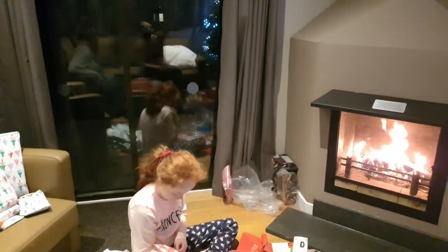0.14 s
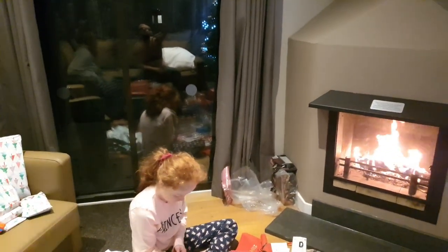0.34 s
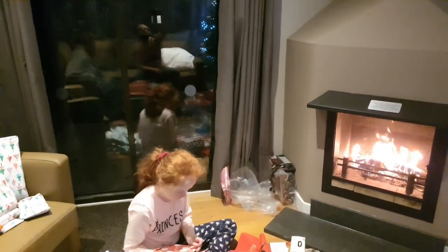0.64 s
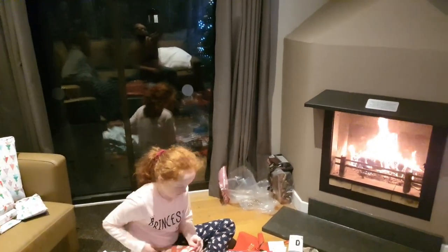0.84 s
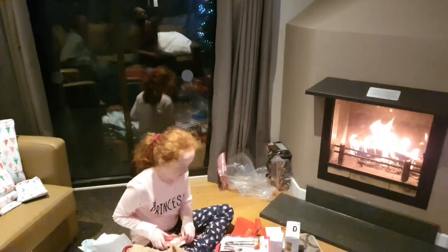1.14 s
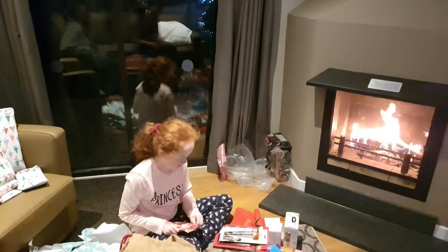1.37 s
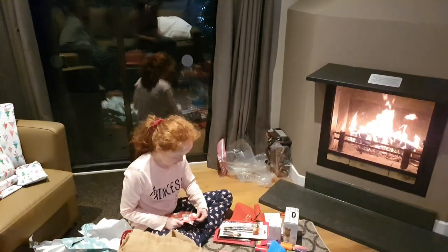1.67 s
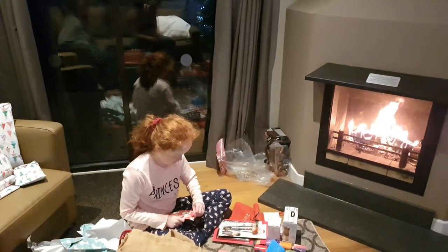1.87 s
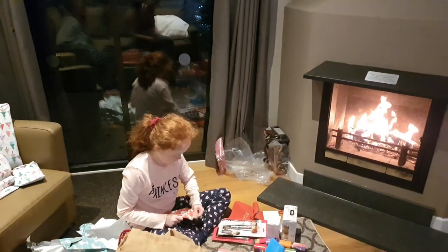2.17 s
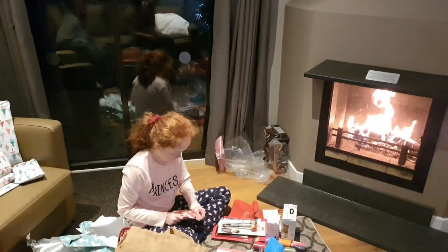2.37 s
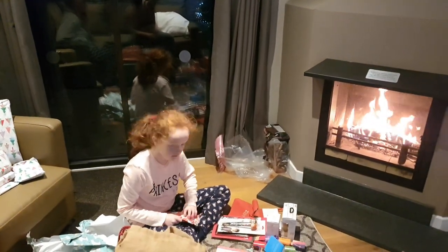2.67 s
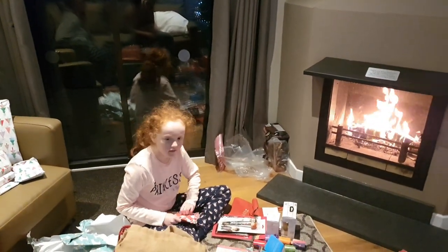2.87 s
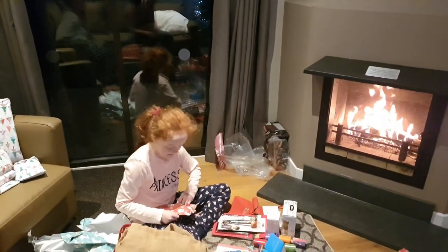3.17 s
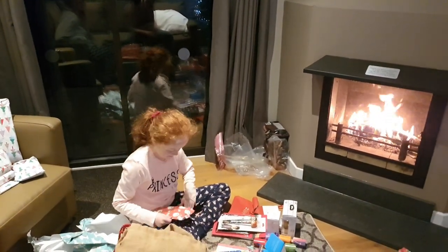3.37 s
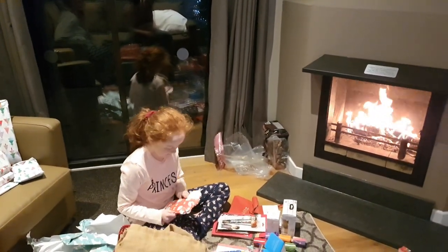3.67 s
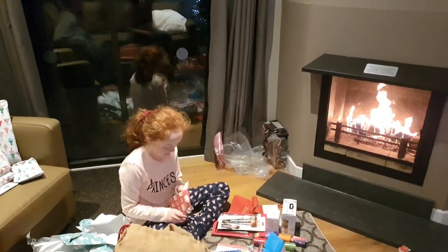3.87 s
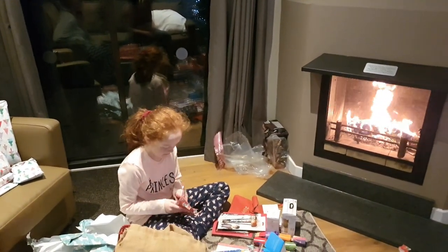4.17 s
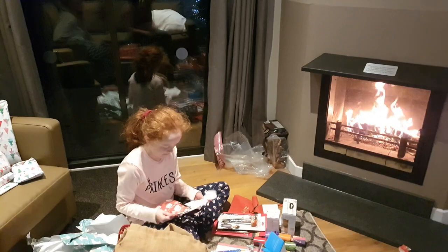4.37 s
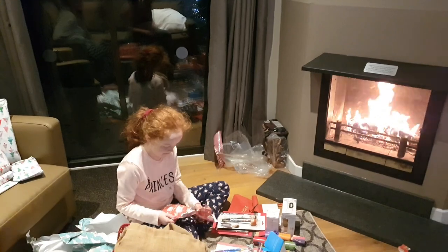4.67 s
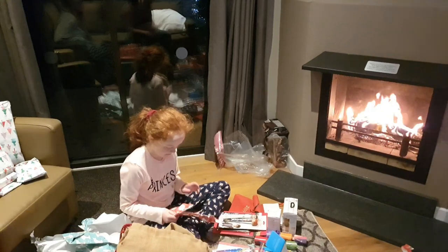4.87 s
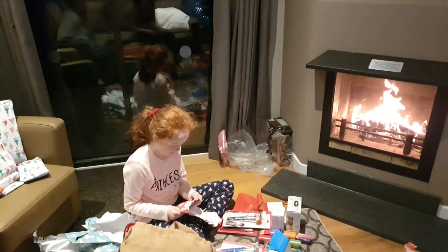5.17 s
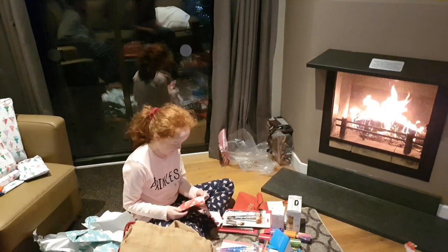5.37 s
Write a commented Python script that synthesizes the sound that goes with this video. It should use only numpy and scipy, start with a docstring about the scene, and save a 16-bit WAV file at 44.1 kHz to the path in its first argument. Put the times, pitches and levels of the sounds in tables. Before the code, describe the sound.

Wrapping paper crackles in small irregular bursts, with sharp fold snaps and quick rips, growing into louder tearing in a quiet living room.

```python
"""Wrapping paper crackles as a child on a living-room floor picks at a small present and tears it open.
Creases and breaking fibres make crowds of tiny clicks, quick rips are short bursts, and single folds snap.
Filtered noise flexes the sheet and rings the parcel, whose hollow bumps are short scrapes through a resonance.
The room adds early echoes and a short tail, over a low rumble with faint hiss."""
import sys
import numpy as np
from scipy import signal
from scipy.fft import rfft, irfft, next_fast_len
from scipy.io import wavfile

SR = 44100
rng = np.random.default_rng(int(sys.argv[2]) if len(sys.argv) > 2 else 0)


def generate_wav(sig):
    """Save sig (samples, or channels by samples) to the path in sys.argv[1] as 16-bit PCM at SR."""
    pcm = np.round(np.clip(np.atleast_2d(sig).T, -1, 1) * 32767).astype(np.int16)
    wavfile.write(sys.argv[1], SR, pcm)


N = 243873
T = np.arange(N) / SR  # time [s]


def undb(db):
    """Turn decibels into gain."""
    return 10 ** (np.asarray(db) / 20)


def unit(x):
    """Scale a sound to an rms level of 1."""
    return x / np.sqrt(np.mean(x ** 2))


def even(response):
    """Scale an impulse response so its squares add up to 1."""
    return response / np.sqrt(np.sum(response ** 2))


def at(points, hz):
    """Read (Hz, value) points, with straight lines between them on a log-frequency axis."""
    f, value = np.transpose(points)
    return np.interp(np.log(np.maximum(hz, 1)), np.log(f), value)


def ring(x, response):
    """Pass a sound through an impulse response, by convolution."""
    return signal.oaconvolve(x, response)[:len(x)]


def colour(points, size=4096):
    """Make an impulse response with a given (Hz, dB) spectrum that never sounds before its cause."""
    log_gain = np.log(undb(at(points, np.fft.rfftfreq(size, 1 / SR))))
    cepstrum = irfft(log_gain)
    # folding the second half onto the first puts the energy as early as possible (minimum phase)
    cepstrum[1:size // 2] *= 2
    cepstrum[size // 2 + 1:] = 0
    return irfft(np.exp(rfft(cepstrum)))


def brighten(x, treble_db, hinge_hz=6000):
    """Lift or lower everything above the hinge, like a treble knob."""
    low = signal.sosfiltfilt(signal.butter(2, hinge_hz, fs=SR, output="sos"), x)
    return low + undb(treble_db) * (x - low)


def hollow(x, middle_db, centre_hz=1350):
    """Lift or lower the papery middle with a bell-shaped filter."""
    band = signal.lfilter(*signal.iirpeak(centre_hz, .8, fs=SR), x)
    return x + (undb(middle_db) - 1) * band


def walk(rate):
    """Wander at random with a spread near 1: `rate` new values a second, joined by straight lines."""
    points = rng.standard_normal(N // 100)
    return np.sqrt(3 / 2) * np.interp(T * rate, np.arange(len(points)), points)


def rustle(clicks_per_s=2400, crackle_db=-1.0, usual_db=-46, crowding=0.65, snag_db=0.86, snags_per_s=60,
           folds_per_s=45, fold_db=-8):
    """Handling and long tears: harder work brings more clicks, and small folds flip among them."""
    work_db, treble_db, middle_db = hands()
    crowd = undb(crowding * (work_db - usual_db))  # 1 at the usual work level
    fibres = crackle(clicks_per_s * crowd, spread_db=6.0)
    folds = crackle(folds_per_s * crowd, spread_db=1.5)
    clicks = hollow(brighten(fibres + undb(fold_db) * folds, treble_db), middle_db)
    # the paper snags and lets go, so the level wanders quickly
    level_db = work_db + crackle_db + snag_db * walk(snags_per_s)
    return deforming(clicks * undb(level_db))


def hands(rest_db=-80):
    """Add up the work of the hands in dB; the strongest gesture counts most for treble and middle."""
    power, treble, middle = undb(rest_db) ** 2, 0, 0
    for envelope, db, _, treble_db, middle_db in gestures():
        share = (undb(db) * envelope) ** 2
        power = power + share
        treble = treble + share * treble_db
        middle = middle + share * middle_db
    return 10 * np.log10(power), treble / power, middle / power


def gestures(grip_s=.006, let_go_s=0.017, drift_db=-0.5, squeeze_s=0.017, relax_s=0.016):
    """Give each pull and squeeze as (envelope, crackle dB, flex dB, treble dB, middle dB)."""
    # steady pulls, from light fingering to the long tear, all levels relative:
    # (start [s], length [s], crackle [dB], flex [dB], treble change [dB], middle change [dB])
    pulls = [(0.17, 0.14, -41.5, -61.5, -3.5, 1.5), (0.349, 0.066, -54, -64, 1.5, 5.5),
             (0.666, 0.074, -55.5, -72, 2, 4), (0.777, 0.094, -52, -58.5, -7, 4),
             (1.117, .12, -55, -68.5, -3.5, -2.5), (1.247, 0.13, -50.5, -60.5, -8.5, 1.5),
             (1.498, 0.21, -49.5, -63, -12.5, -3.5), (1.793, 0.12, -49, -64, -5, -8),
             (1.946, 0.15, -59, -68, 10, 6.5), (2.084, .16, -50.5, -57.5, 0, -1),
             (2.395, 0.23, -50, -60.5, -8.5, 0), (2.592, 0.31, -47, -56.5, -4, 0),
             (2.95, .11, -40.5, -52.5, 2, 7), (3.23, 0.14, -50, -53.5, -1.5, 6.5),
             (3.347, 0.1, -42, -47, -1.5, 4.5), (3.657, 0.057, -55, -63, -12, 5.5),
             (3.747, .14, -44.5, -53.5, -5.5, 2.5), (3.928, 0.098, -44, -57, -16, -1.5),
             (4.229, 0.089, -34.5, -51.5, -3.5, 0), (4.319, 0.15, -32, -40, -3, 2),
             (4.522, 0.045, -38.5, -56, -1.5, -1), (4.655, 0.041, -41, -54.5, 4.5, 4.5),
             (4.70, 0.16, -53.5, -63, -23, -2.5), (4.937, .06, -57.5, -71, -3, 3),
             (5.0, 0.12, -50.5, -59, -19, 0.5), (5.102, .1, -45, -56, -13, -2),
             (5.254, 0.13, -46, -57.5, -9, -3), (5.392, 0.094, -49, -51.5, -25, 7.5)]
    # short squeezes that crumple the paper, all levels relative:
    # (peak time [s], crackle [dB], flex [dB], treble change [dB], middle change [dB])
    crumples = [(0.066, -47.5, -59.5, 4.5, 12), (0.574, -40, -47.5, 1, 5), (0.772, -37.5, -61, -0.5, -5),
                (0.973, -47.5, -53, 4.5, 5.5), (1.432, -37.5, -50.5, -10, 6), (1.616, -41, -80, 4.5, -3),
                (2.011, -44, -74, -8, -2.5), (2.797, -40, -47.5, 1.5, 5), (2.91, -42, -69, -5, 2.5),
                (3.047, -32.5, -49, -4, -6.5), (3.108, -32, -42.5, -1, 5), (3.39, -36.5, -57, -5, 6),
                (4.145, -47.5, -55.5, 0.5, 0), (4.395, -30, -42, 2, 1.5), (4.468, -33, -40, 5, 6),
                (4.822, -45, -52.5, -24, -1.5)]
    for s, length, *touch in pulls:
        grip = 1 - np.exp(-np.maximum(T - s, 0) / grip_s)
        drift = undb(drift_db * (np.clip((T - s) / length, 0, 1) - .5))  # eases off slightly
        let_go = np.exp(-np.maximum(T - s - length, 0) / let_go_s)
        yield grip * drift * let_go, *touch
    for s, *touch in crumples:
        yield np.exp(-np.maximum((s - T) / squeeze_s, (T - s) / relax_s)), *touch


def crackle(rate, spread_db, decay_s=0.00047, size=128):
    """Scatter clicks at random moments: mostly small, each a short fading grain of noise."""
    strength = undb(spread_db * np.minimum(rng.exponential(size=N), 4))
    energy = strength ** 2 * (rng.random(N) < rate / SR)
    # dividing by the rate keeps a denser crowd from also being louder
    energy = ring(energy / rate, np.exp(-2 * T[:size] / decay_s))
    return unit(np.sqrt(np.abs(energy)) * rng.standard_normal(N))


def deforming(x, wander_db=1.7, changes_per_s=22, count=14):
    """As the sheet changes shape its resonances come and go: each band's level wanders by itself."""
    size = next_fast_len(N)
    centres, hz = np.geomspace(800, 15000, count), np.fft.rfftfreq(size, 1 / SR)
    spectrum, out = rfft(x, size), 0
    for weights in np.eye(count):  # each row picks out one band
        band = irfft(spectrum * at(list(zip(centres, weights)), hz), size)[:N]
        out = out + band * undb(wander_db * walk(changes_per_s))
    return out


def rips():
    """A split runs quickly through taut paper: bursts of fibre clicks, and noise tugging the sheet."""
    # quick rips, fibres parting in one run, all levels relative:
    # (start [s], length [s], crackle [dB], tug [dB], treble change [dB], middle change [dB])
    splits = [(0.18, 0.007, -49.5, -79, 3, 10), (0.473, 0.003, -41, -52, 6.5, 3.5),
              (0.755, 0.018, -34.5, -56.5, -9, -1.5), (1.404, 0.0042, -35, -74, -22, -17),
              (1.477, 0.0082, -34, -55, -6.5, 1.5), (2.125, 0.038, -44, -81, 6, 5.5),
              (2.271, 0.025, -32, -39, -3.5, 3.5), (3.233, 0.0089, -47, -75, -17, 14.5),
              (3.738, 0.0028, -42.5, -42.5, -13, 8.5), (3.904, 0.038, -41.5, -62, -0.5, 9),
              (4.095, 0.0072, -42.5, -52.5, -13, -1)]
    fibres, tug = np.zeros((2, N))
    clicks = crackle(6000, spread_db=3.0)
    pull = rng.standard_normal(N)
    for s, length, db, flex_db, treble_db, middle_db in splits:
        run = slice(int(s * SR), int((s + length) * SR))
        burst = brighten(unit(clicks[run]), treble_db)
        fibres[run] += undb(db) * hollow(burst, middle_db)
        tug[run] += undb(flex_db) * pull[run]
    return fibres, tug


def snaps(snap_db=14.0, treble_db=4.5, decay_s=.00035, shiver_db=-16, shiver_s=.003, size=1024):
    """A fold flips over with one sharp tick of noise, and the paper shivers more softly after it."""
    # single folds and tape edges that snap: (time [s], relative level [dB])
    folds = [(0.0338, -37), (0.1754, -34), (0.4643, -32), (0.6784, -43), (0.7377, -27), (0.7522, -29),
             (1.1258, -43), (1.3977, -36), (1.4745, -33), (1.5499, -38), (1.5748, -32), (1.8048, -45),
             (1.8721, -34), (2.1385, -24), (2.2722, -20), (2.4139, -37), (2.6085, -37), (2.7392, -34),
             (2.9113, -30), (3.0844, -26), (3.2321, -36), (3.675, -45), (3.7334, -32), (3.7793, -32),
             (4.0143, -36), (4.0961, -38), (4.2193, -39), (4.5496, -28), (4.6099, -22), (4.816, -36),
             (4.9327, -39), (5.0045, -41), (5.1158, -30), (5.1522, -31), (5.2485, -40), (5.2964, -34),
             (5.3672, -38), (5.4171, -34), (5.4834, -36)]
    out = np.zeros(N + size)
    t = T[:size]
    fade = np.exp(-t / decay_s) + undb(shiver_db) * np.exp(-t / shiver_s)
    for (s, db), grain in zip(folds, rng.standard_normal((len(folds), size))):
        start = int(s * SR)
        out[start:start + size] += undb(db + snap_db) * even(grain * fade)
    return brighten(out[:N], treble_db, hinge_hz=9500)


def bend():
    """The same gestures bend the whole sheet: their flex strengths add as powers."""
    return np.sqrt(sum((undb(flex_db) * envelope) ** 2 for envelope, _, flex_db, _, _ in gestures()))


def flexing(drive):
    """The sheet flaps over a broad range and rings the fading tones of the parcel under it."""
    # colour of the flapping sheet: (frequency [Hz], relative level [dB])
    sheet_tone = [(70, -25), (140, -6.5), (260, -5), (380, 0), (500, 9.5), (620, 0.5), (850, 5),
                  (1300, -26), (2500, -16.5)]
    # tones of the wrapped parcel: (frequency [Hz], time to fade by 60 dB [s], relative level [dB])
    parcel = [(425, .10, -12), (480, .08, -11), (596, .11, -12), (682, .09, -16)]
    t, modes = T[:SR // 4], 0
    for hz, t60, db in parcel:
        tone = np.sin(2 * np.pi * hz * t) * np.exp(-np.log(1000) * t / t60)
        modes = modes + undb(db) * even(tone)
    return ring(drive, even(colour(sheet_tone))) + ring(drive, modes)


def bumps(sharpness=2.9, size=8192):
    """A short scrape of contact noise rings one hollow resonance."""
    # bumps, pops and rubs of the wrapped parcel, plus a brief high ring at 2.27 s: (time [s], pitch [Hz],
    # length [s], relative level [dB])
    knocks = [(0.219, 298, 0.02, -53), (0.678, 517, 0.0074, -50), (0.874, 235, 0.048, -59.5),
              (2.128, 550, 0.015, -44.5), (2.272, 1840, 0.015, -31), (2.274, 240, 0.0073, -45.5),
              (2.275, 444, 0.0088, -36.5), (2.693, 1080, 0.0061, -44.5), (3.089, 517, 0.042, -44.5),
              (3.383, 483, 0.031, -51), (3.753, 303, 0.02, -48.5), (3.921, 400, 0.017, -45),
              (4.423, 92, 0.0533, -59.5), (4.446, 192, 0.021, -51), (4.450, 405, 0.029, -40.5),
              (5.084, 430, 0.0154, -48), (5.148, 328, .016, -47), (5.401, 980, 0.0064, -42.5),
              (5.429, 785, 0.052, -48.5), (5.478, 144, 0.032, -50.5)]
    out = np.zeros(N + size)
    for (s, hz, length, db), contact in zip(knocks, rng.standard_normal((len(knocks), size))):
        scrape = contact * (T[:size] < length)
        tone = signal.lfilter(*signal.iirpeak(hz, sharpness, fs=SR), scrape)
        start = int(s * SR)
        out[start:start + size] += undb(db) * np.sqrt(length * SR) * even(tone)
    return out[:N]


def scatter(x, count, size=64):
    """Each crease faces its own way, so short slices of sound take different paths through the room."""
    path = np.repeat(rng.integers(0, count, N // size + 1), size)[:N]
    return sum(room(x * (path == k)) for k in range(count))


def room(x, direct_db=-6.0, tail_db=-1.5, build_s=.002, right_lag=3, size=18000):
    """Direct sound (left first, right a few samples later), early echoes and a tail longest in the bass."""
    # early echoes off floor and furniture: (rough delay [s], level against the direct sound [dB])
    echoes = [(.005, -2), (.0092, -12.5), (0.0131, -28.5), (0.011, -5)]
    # how long the tail lasts: (frequency [Hz], time to fade by 60 dB [s])
    fade_times = [(150, .5), (500, 0.3), (1400, 0.28), (4000, 0.28), (10000, 0.22), (16000, 0.25)]
    t, hz = T[:size], np.fft.rfftfreq(size, 1 / SR)
    noise, tail = rfft(pair(size)), 0
    for k, (_, t60) in enumerate(fade_times):
        share = at([(f, j == k) for j, (f, _) in enumerate(fade_times)], hz)
        tail = tail + irfft(noise * share, size) * np.exp(-np.log(1000) * t / t60)
    tail = tail * (1 - np.exp(-(t / build_s) ** 2))
    responses = undb(tail_db) * np.array([even(late) for late in tail])
    responses[[0, 1], [0, right_lag]] += undb(direct_db)
    for delay, db in echoes:
        # each path varies the delay by about 5 %, with a few samples between the ears
        arrival = int(delay * (1 + .05 * rng.standard_normal()) * SR) + rng.integers(0, 8, 2)
        responses[[0, 1], arrival] += undb(direct_db + db) * rng.choice([-1, 1])
    return np.array([ring(x, response) for response in responses])


def pair(size, alike_hz=1000):
    """Make noise for two close microphones: alike in the bass, unrelated in the treble."""
    mid, side = rfft(rng.standard_normal((2, size)))
    hz = np.fft.rfftfreq(size, 1 / SR)
    likeness = np.clip(0.85 / (1 + (hz / alike_hz) ** 3), 0, 1)
    left_right = np.array([[1], [-1]])
    return irfft(mid * np.sqrt(1 + likeness) + left_right * side * np.sqrt(1 - likeness), size)


def still_room(rumble_db=-66.5, swell_db=0.9):
    """Noise filtered into a low rumble with a faint hiss, its level slightly lumpy."""
    # colour of the still room: (frequency [Hz], relative level [dB])
    hush = [(20, -4.5), (32, -34), (45, -7), (75, -0.5), (98, 2), (130, -6), (200, -9.5), (400, -20),
            (1000, -25), (4000, -29), (16000, -34)]
    rumble = np.array([ring(side, even(colour(hush))) for side in pair(N)])
    return rumble * undb(rumble_db + swell_db * walk(21))


def scene(flex_db=-3.0, nudge_db=-16):
    """Put crackling paper, the flexing sheet and parcel bumps in the room, over its quiet background."""
    # colour of the crackling paper: (frequency [Hz], relative level [dB])
    paper_tone = [(400, -32.5), (700, -8.5), (850, -8.5), (1100, -1.5), (1500, -2.5), (2000, -1),
                  (2800, 0.5), (3900, 2.5), (5000, 0.5), (7400, -5), (9800, 0.5), (12000, -4.5),
                  (16000, -7)]
    fibres, tug = rips()
    ticks = snaps()
    # each snap also nudges the sheet
    bending = rng.standard_normal(N) * bend() * undb(flex_db) + tug + undb(nudge_db) * ticks
    crackling = scatter(rustle() + fibres + ticks, count=12)
    paper = [ring(side, even(colour(paper_tone))) for side in crackling]
    sheet = [flexing(side) for side in scatter(bending, count=4)]
    return np.array(paper) + np.array(sheet) + room(bumps()) + still_room()


def record(dry, top_hz=15900):
    """Give each of the two microphones its own colour, and cut the sound steeply above top_hz."""
    # left microphone minus right: (frequency [Hz], level difference [dB])
    ports = [(60, -3.5), (200, -1.5), (700, 1), (1800, 2), (3000, 0.5), (4200, -2.5), (6000, 2),
             (7900, 5.5), (9300, -4.5), (12000, -1.5), (13500, 9.5), (15000, 1)]
    heard = []
    for x, sign in zip(dry, (1, -1)):  # each side takes half the difference
        heard.append(ring(x, colour([(hz, sign * db / 2) for hz, db in ports])))
    return signal.sosfilt(signal.ellip(12, .2, 70, top_hz, fs=SR, output="sos"), heard)


dry = scene()
out = record(dry)
generate_wav(out)
```